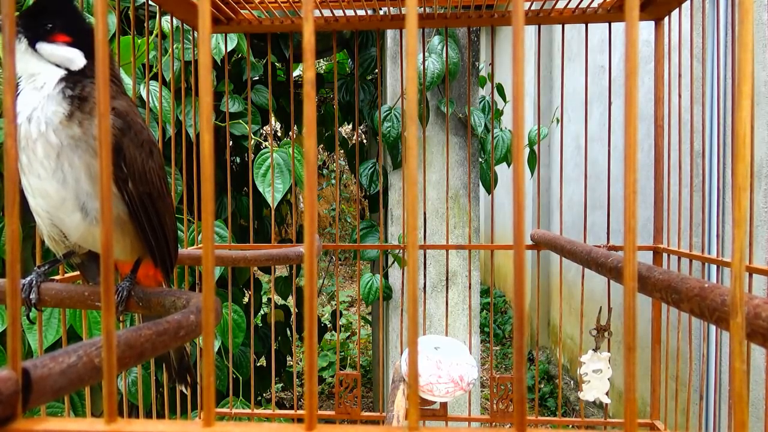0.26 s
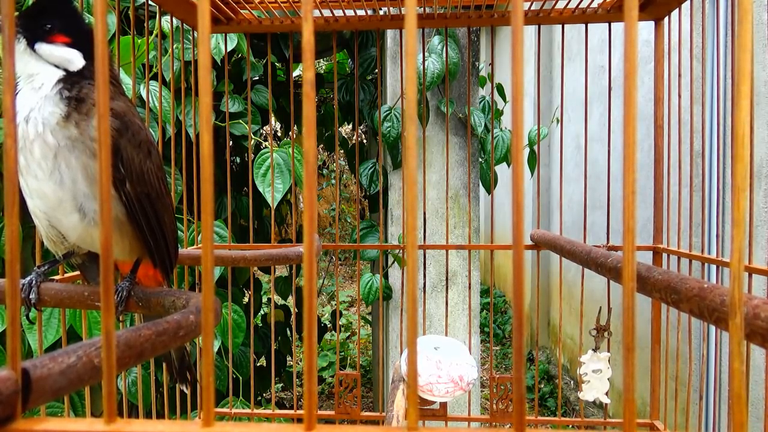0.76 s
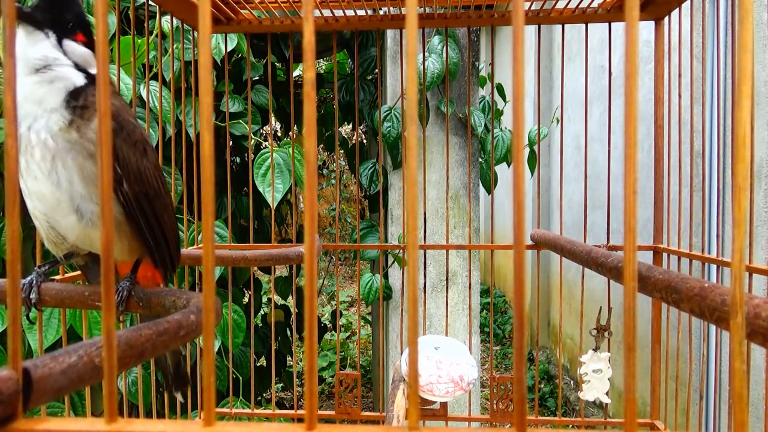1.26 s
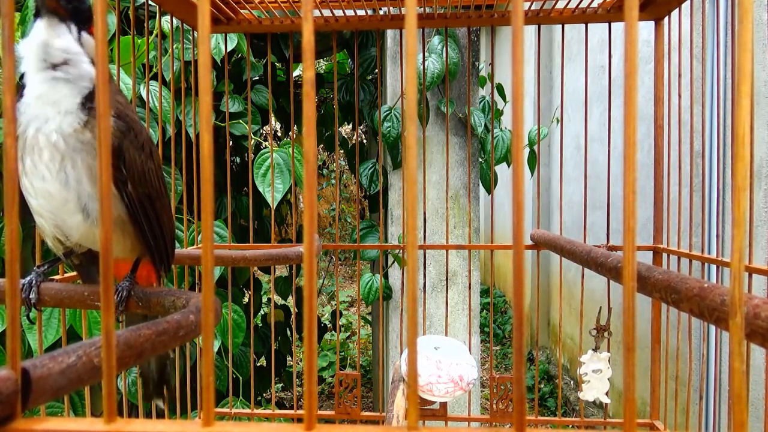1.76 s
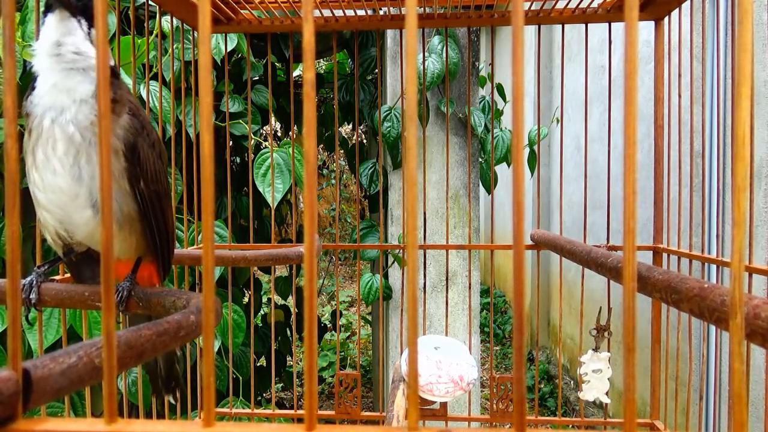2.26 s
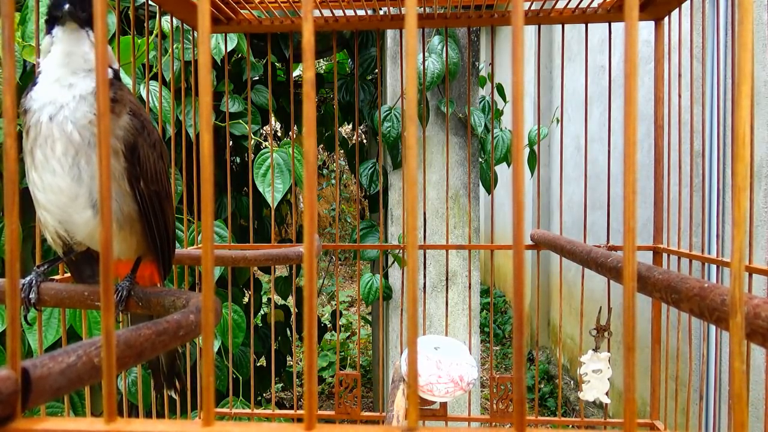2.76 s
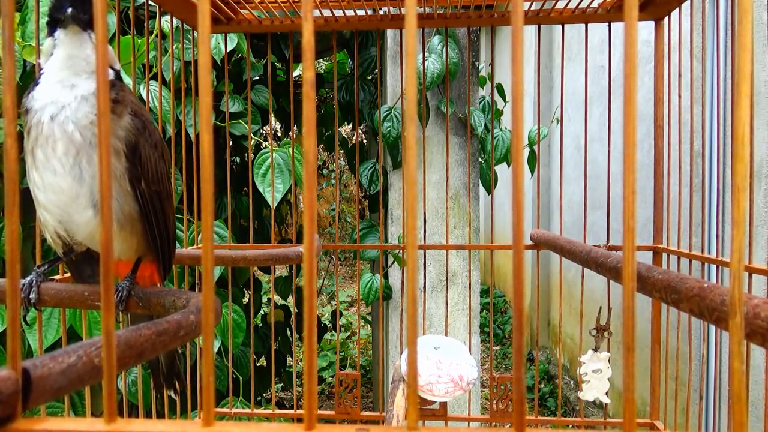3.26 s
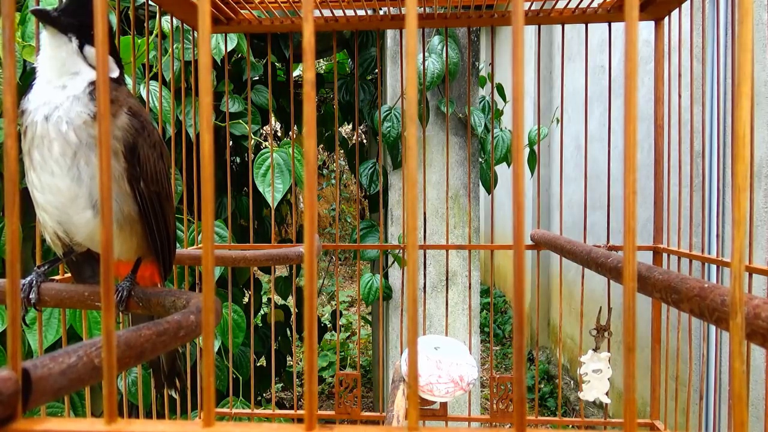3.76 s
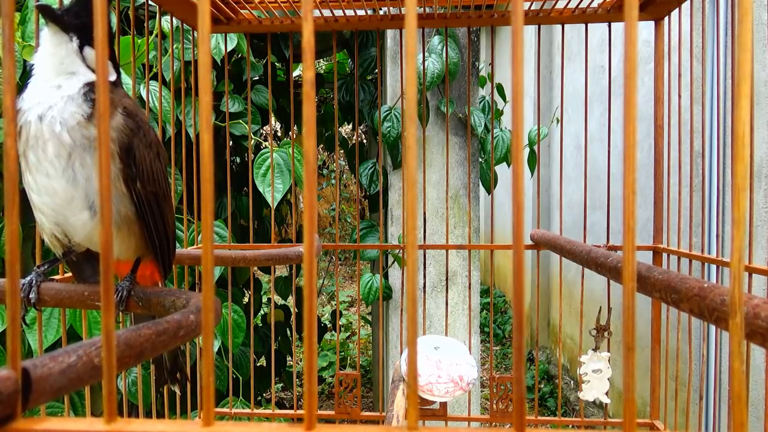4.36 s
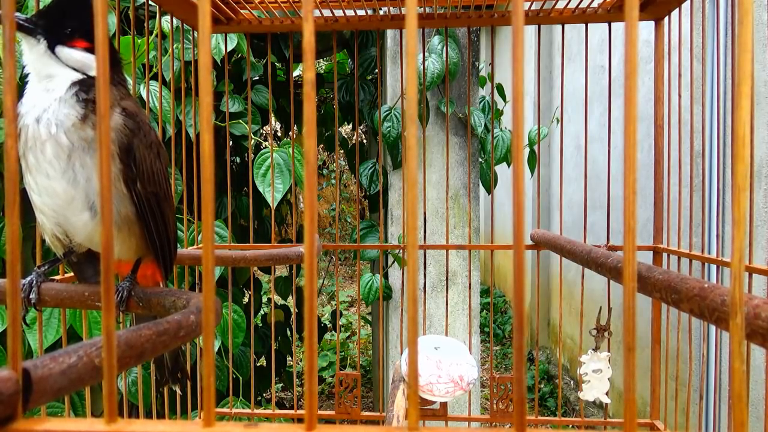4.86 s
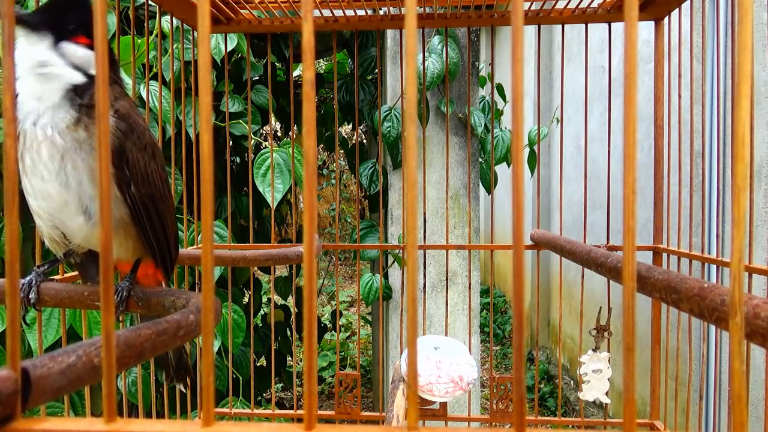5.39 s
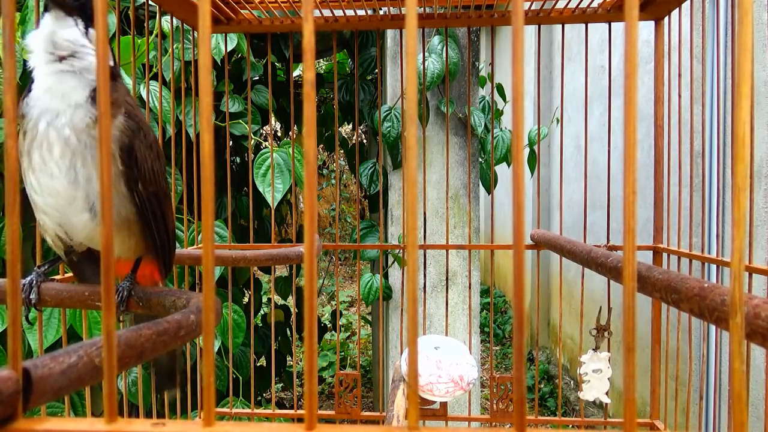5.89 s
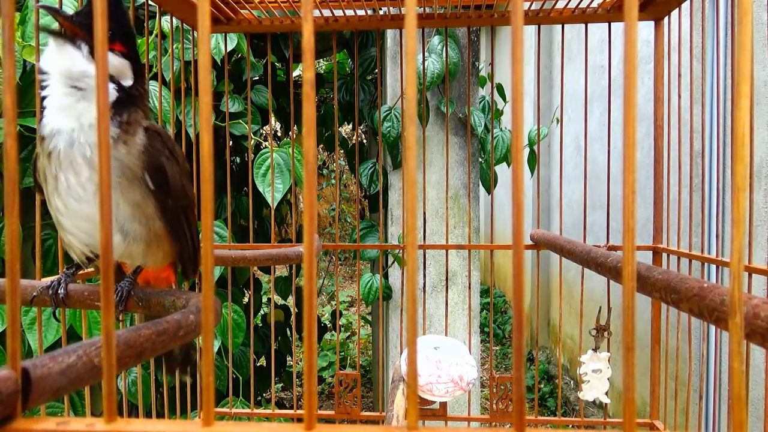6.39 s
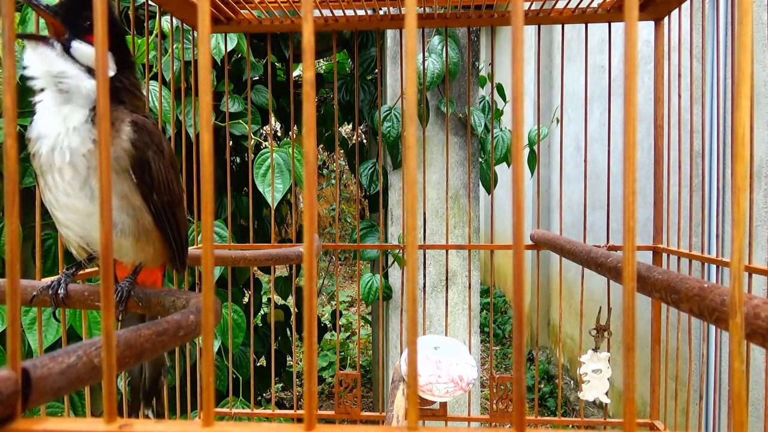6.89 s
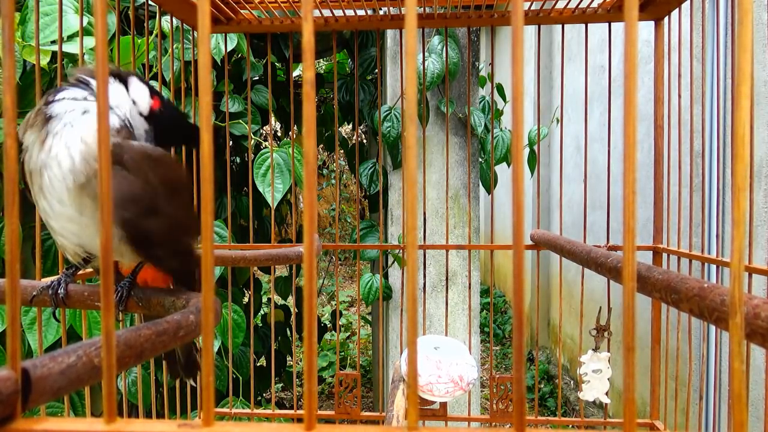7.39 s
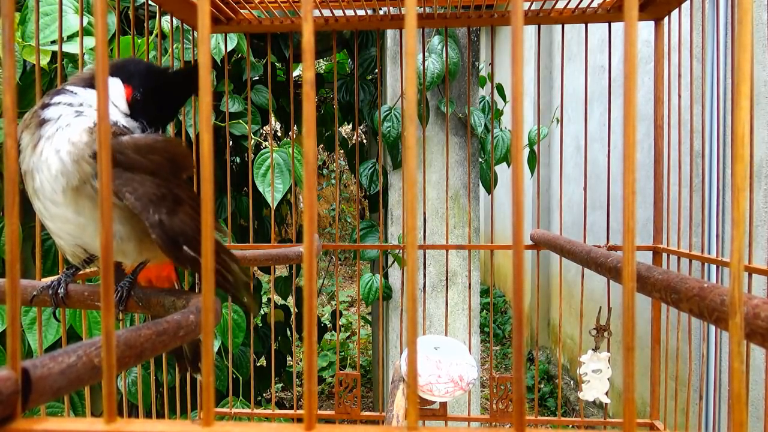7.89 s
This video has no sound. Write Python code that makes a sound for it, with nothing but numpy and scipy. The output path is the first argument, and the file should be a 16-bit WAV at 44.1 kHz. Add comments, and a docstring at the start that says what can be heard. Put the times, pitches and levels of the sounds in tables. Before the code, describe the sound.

Close, overloaded birdsong outdoors: two brief phrases of sliding, liquid whistles and rattling trills, each about a second or more, with short echoes from walls. Each loud burst makes the background duck and slowly swell back. Between and after them lie thin high insect drone, wavering distant engine hum, steady hiss, sparse remote bird calls, and slight scratches of claws and feathers.

```python
"""Loud whistles and buzzy trills: a caged bulbul sings two phrases close by in a walled garden.
Behind it insects drone, far birds call, feathers and claws scratch, distant traffic hums, and hiss lies under all.
The bird is a gliding sine with overtones, opened and shut by trill beats, roughened by overload rasp and echoed.
Insects, traffic and hiss are shaped noise; far birds and engine hums are wavering sines.
Song peaks overload a gain control, which ducks the garden and lets it swell back; one note is cut short."""
import sys
import numpy as np
from scipy import signal
from scipy.fft import rfft, irfft
from scipy.io import wavfile
from scipy.ndimage import uniform_filter1d, minimum_filter1d

SR = 44100
rng = np.random.default_rng(int(sys.argv[2]) if len(sys.argv) > 2 else 0)


def master_out(mix):
    """Clip the mix to full scale and print it as 16-bit PCM to the path in sys.argv[1]."""
    frames = np.transpose(np.atleast_2d(mix))
    ceiling = np.clip(frames, -1, 1)
    pcm = np.round(ceiling * 32767).astype(np.int16)
    wavfile.write(sys.argv[1], SR, pcm)


N = 358974
TIME_S = np.arange(N) / SR

# Rattles, fast trills on one shared upward sweep. Each row: start in s, length in s, level in dB,
# swell over the note in dB, strain in dB, starting beats per s, trill depth at the start (0-1),
# trill depth at the end (0-1), glide in s, top pitch in Hz.
RATTLE_NOTES = [ (1.545, .1, 7.5, -7.5, 10.5, 153, 0.7, 0.12, 0.087, 3550),
                (5.5177, 0.15, 14, 11.5, 4, 117.6, 1, 0.75, 0.11, 3417),
                (6.2719, 0.16, 14, 10.5, 4.5, 126, 0.92, 0.99, 0.11, 3437), ]
# Whistles, which glide onto a main pitch and bend away. Each row: the first nine columns of a rattle,
# then first, main and last pitch in Hz, closing drop as a share of the pitch.
WHISTLE_NOTES = [ (1.228, 0.075, 1, 9, -6.5, 230, 0, 0, .031, 1408, 1544, 1311, .42),
                 (1.788, 0.025, 12, 11, 10.5, 129, .9, .3, 0.015, 2557, 2930, 2600, 0),
                 (1.812, 0.043, 9.5, -5, 9, 121, 0.36, .1, 0.034, 2528, 2210, 2280, .5),
                 (1.919, 0.026, 8.5, -2.5, 12, 156, .6, 0.93, 0.034, 1386, 2500, 2500, 0),
                 (1.942, .043, 16, 3.5, 11.5, 145, .05, .1, 0.01, 2670, 3047, 3140, 0),
                 (2.049, .037, 14, 8.5, 12, 190, .5, 0, 0.01, 2897, 2323, 2280, 0),
                 (2.141, 0.034, 10.5, -15.5, 12.5, 170, 0.5, .15, 0.0064, 1380, 1720, 1637, 0),
                 (2.173, .029, 8.5, -2.5, 7.5, 130, .3, .05, 0.0076, 1957, 2235, 2030, 0),
                 (2.2053, .038, 12, -11.5, 14, 166, 0.8, 0.3, .016, 2096, 1749, 1710, 0),
                 (5.795, .029, 8, 8, 17, 120, .1, .55, 0.032, 1267, 1843, 1860, 0),
                 (5.821, 0.059, 14.5, -5, 11.5, 140, .1, .2, .033, 2083, 2338, 2310, 0),
                 (5.951, .028, 8.5, -2, 18, 167, 0.52, 0.46, 0.027, 1636, 2090, 1900, 0),
                 (5.982, .016, 15, 3, 9.5, 320, .6, .6, 0.013, 2153, 2360, 2400, 0),
                 (6.552, .081, 12.5, 10.5, 11.5, 128, .35, .15, .061, 1328, 2312, 2300, .55),
                 (6.721, .031, 7.5, -10.5, 12, 129, 0.78, 0.3, 0.034, 1607, 2028, 2050, 0),
                 (6.751, 0.052, 17.5, 17.5, 11.5, 150, 0.41, .1, 0.029, 2213, 2783, 2680, .55),
                 (6.86, 0.071, 18, -11, 11, 107, .95, 0.23, 0.079, 2105, 2507, 2500, 0),
                 (6.933, .028, 13.5, -10, 14, 137, .7, .05, 0.02, 2420, 3020, 2450, 0),
                 (6.962, 0.05, 13.5, -1.5, 15, 73, .15, 0, 0.017, 2567, 1851, 1798, .5), ]
# Relative overtone spectrum of the voice. Each row: frequency in Hz, level in dB.
OVERTONE_SPECTRUM = [(3000, -23.5), (4600, -33.5), (5600, -35), (7000, -36.5), (8200, -45), (9300, -44),
                     (10700, -29.5), (12000, -40), (13800, -39.5), (15500, -48)]
# Relative spectrum of the overload rasp on the notes. Each row: frequency in Hz, density in dB per Hz.
RASP_SPECTRUM = [(100, -3.5), (700, -6.5), (1600, -4.5), (2900, 17.5), (4500, 1.5), (7000, -1.5),
                 (8700, -12), (10800, 1.5), (12000, -6), (13400, -1.5), (15300, -13)]
# Reflections off cage, floor and walls. Each row: delay in s, level in dB relative to the song.
NEAR_REFLECTIONS = [(.0032, -24), (.0075, -24), (0.0142, -19.5), (0.022, -25.5), (.047, -38)]
# Echo decay of the garden. Each row: frequency in Hz, time to fall 60 dB in s.
GARDEN_DECAY = [(500, 0.13), (1500, 0.29), (3000, 0.53), (7000, 0.17), (14000, 0.73)]
# Far birds. Each row: start in s, length in s, first pitch in Hz, last pitch in Hz,
# level in dB ahead of the direct and echo gains.
FAR_BIRD_CALLS = [(0.032, 0.15, 4350, 4370, -53), (0.322, 0.13, 4050, 4120, -54),
                  (2.43, 0.092, 3950, 4048, -52), (4.301, 0.1, 4140, 4100, -47),
                  (4.67, 0.0805, 3770, 3930, -48.5), (5.002, 0.1, 3350, 2640, -38),
                  (7.134, 0.6, 2430, 2426, -55.5), (7.684, 0.5, 2470, 2400, -58)]
# Feathers and claws. Each row: start in s, length in s, mean level in dB at the crest.
SCRATCHES = [(4.832, .012, -59.5), (4.962, 0.0092, -56), (6.182, 0.0067, -45.5), (7.408, 0.093, -51),
             (7.654, 0.028, -62), (7.86, .025, -53.5), (8.042, .008, -50.5)]
# Insect choruses. Each row: centre in Hz, half width in Hz, mean level before the cut in dB,
# mean level after it in dB, throb depth after it (0-1).
INSECT_CHORUSES = [(4765, 170, -51.5, -51.5, 0.19), (6745, 260, -50.5, -57, 0.4),
                   (6080, 100, -60.5, -65, .6), (7480, 250, -60, -62, .6)]
# Relative spectrum of distant traffic. Each row: frequency in Hz, density in dB per Hz.
TRAFFIC_SPECTRUM = [(15, -48.5), (25, -12.5), (195, -5.5), (350, -6), (380, -2.5), (459, -9), (616, -8.5),
                    (713, -13), (997, -15.5), (1990, -25.5), (2670, -25), (3730, -31.5), (4850, -62),
                    (8210, -120)]
# Course of the traffic. Each row: time in s, swell in dB,
# tilt in dB (added to the upper part, taken from the lower).
TRAFFIC_COURSE = [(0, -2, -1.5), (1.102, -1, 1), (2.5, 0, -1.5), (3.598, -1.5, -2), (4.5, -2, -1),
                  (5.3, -2.5, -2), (5.97, -1.5, 0), (6.021, 0, -2.3), (7.199, -1.5, -1.1),
                  (8.101, -0.5, -2)]
# Engine hums. Each row: two end times in s (in either order), mean pitch in Hz, level in dB before wavering.
ENGINE_HUMS = [(-1.5, 1.3, 383, -45), (-1.27, 3.2, 615.6, -51.5), (.3, 1.56, 250.5, -47.5),
               (4.5, 3.4, 372, -44.5), (2.3, 5.5, 612.2, -50.5), (3.901, 5.8, 60.26, -51),
               (4.3, 5.9, 210, -48.5), (5.8, 6.85, 275.2, -41), (6.8, 12, 275, -39.5), (5.8, 18, 408, -43)]
# Relative spectrum of the hiss. Each row: frequency in Hz, density in dB per Hz.
HISS_SPECTRUM = [(1000, -6.5), (3500, 0), (5500, 1), (8000, -1), (10000, -4.5), (13500, -3.5),
                 (15500, -9.5)]

CUT_S = 5.985  # song and echoes break off; insects and gain control change state
BAND_LIMIT_HZ = 15750
ATTACK_S, RELEASE_S, EDGE_DB = 0.0037, 0.0045, 18.5  # a note starts and ends EDGE_DB under its level
LEAD_S, LEAD_FADE_DB, SCOOP_SHARE = .014, 11, .08  # the syrinx stirs softly and lower before a note
TAIL_S, TAIL_FADE_DB = .01, 9.5  # and slackens after it
TRILL_SLOWING_PER_S, BEAT_UNEVENNESS = 0.99, .04  # share per s; rms in beats
TRILL_SWING_SHARE, CREST_TURN = 0.12, 0.23  # pitch flick as a share of the pitch, its place in the beat
SHUT_DB, OPEN_SHAPE = 33, .95  # dip between full-depth beats
PITCH_JITTER_SHARE = .004  # rms
RATTLE_FIRST_HZ, RATTLE_SAG_HZ, RATTLE_RELEASE_S = 1892, 60.43, 0.049
FULL_STRAIN_DB, DULLING = 9.5, 0.11  # dB an octave lost per dB of strain short of full


def amp(db):
    """Decibels to gain."""
    return 10 ** (np.asarray(db) / 20)


def unit(x):
    """Scales to rms 1."""
    return x / np.sqrt(np.mean(x ** 2) + 1e-20)


def read(points, hz):
    """Interpolates a table on a log-frequency axis."""
    point_hz, value = np.transpose(points)
    return np.interp(np.log(hz + 1), np.log(point_hz + 1), value)


def add(mix, start_s, sound):
    """Mixes a sound in place, starting at start_s."""
    part = mix[max(round(start_s * SR), 0):][:len(sound)]
    part += sound[:len(part)]


def noise(shape):
    """Noise of rms 1 whose spectrum follows the gain shape(Hz)."""
    spectrum = rfft(rng.standard_normal(N)) * shape(np.fft.rfftfreq(N, 1 / SR))
    return unit(irfft(spectrum, N))


def wide(shape, side_db):
    """Two channels of noise: a shared middle and a weaker side of opposite sign."""
    return unit(noise(shape) + amp(side_db) * noise(shape) * np.array([[1], [-1]]))


def drift(hz):
    """Random motion of rms 1, its spectrum fading around hz."""
    return noise(lambda f: np.exp(-(f / hz) ** 2))


def syllable(waver, start_s, length_s, level_db, swell_db, strain_db, beats_per_s, depth_first, depth_last,
             glide_s, first_hz, main_hz, last_hz, drop_share, release_s,
             open_lag_rad=.45, overtone_db=5.0, even_db=-6, rasp_shut=0.12):
    """One note and its rasp strength; each beat opens the syrinx, flicks the pitch up and shuts it."""
    t = np.arange(-LEAD_S, length_s + TAIL_S, 1 / SR)
    held = np.clip(t, 0, length_s)
    wobble = np.interp(start_s + t, TIME_S, waver)
    lead = np.maximum(-t / LEAD_S, 0)
    tail = np.maximum((t - length_s) / TAIL_S, 0)

    # Pitch: glide on, bend away, trill on top
    approach = np.maximum(1 - held / glide_s, 0) ** 2
    bend = (np.maximum(held - glide_s, 0) / max(length_s - glide_s, 1e-3)) ** 2
    hz = main_hz + (first_hz - main_hz) * approach + (last_hz - main_hz) * bend
    hz = hz * (1 - SCOOP_SHARE * lead - drop_share * tail)
    depth = np.clip(depth_first + (depth_last - depth_first) * held / length_s, 0, 1)
    beats = beats_per_s * t * (1 - TRILL_SLOWING_PER_S * t / 2) + BEAT_UNEVENNESS * wobble
    beat_rad = 2 * np.pi * beats
    # narrow crest, flat trough
    flick = 2 * ((1 + np.cos(beat_rad - 2 * np.pi * CREST_TURN)) / 2) ** 2 - .5
    hz = abs(hz * (1 + PITCH_JITTER_SHARE * wobble) + TRILL_SWING_SHARE * main_hz * depth * flick)

    phase = 2 * np.pi * np.cumsum(hz) / SR
    tone = np.sin(phase)
    for k in range(2, 12):
        strain_tilt_db = DULLING * (strain_db - FULL_STRAIN_DB) * np.log2(k)
        bright_db = overtone_db + strain_tilt_db + even_db * (k % 2 == 0)
        gain = amp(bright_db + read(OVERTONE_SPECTRUM, k * hz)) * (k * hz < BAND_LIMIT_HZ)
        tone = tone + gain * np.sin(k * phase)

    # Loudness: attack, swelling or sagging hold, release, dip at every beat
    attack = np.maximum(1 - held / ATTACK_S, 0) ** 2
    release = np.maximum(1 - (length_s - held) / release_s, 0) ** 2
    envelope_db = level_db + swell_db * (held / length_s - .5) - EDGE_DB * (attack + release)
    envelope_db = envelope_db - LEAD_FADE_DB * lead - TAIL_FADE_DB * tail
    envelope = amp(envelope_db) * (1 - (lead + tail) ** 2)
    shut_db = SHUT_DB * depth ** 2 * ((1 + np.cos(beat_rad - open_lag_rad)) / 2) ** OPEN_SHAPE
    return envelope * amp(-shut_db) * tone, envelope * amp(strain_db - rasp_shut * shut_db)


def garden(x, build_s=0.029):
    """Diffuse echoes from walls and leaves, each band dying at its own speed."""
    taps = rng.standard_normal(SR) + 0.19 * rng.standard_normal((2, SR))
    hz, t, bands = signal.stft(taps, SR, nperseg=256)
    decay = amp(-60 * t / read(GARDEN_DECAY, hz)[:, None])
    bands = bands * decay * (1 - np.exp(-t / build_s))
    tail = signal.istft(bands, SR, nperseg=256)[1]
    tail = tail / np.linalg.norm(tail[0])
    return signal.fftconvolve(x[None], tail, axes=1)[:, :N]


def bulbul(notes, rasp_db=-42, wet_db=-26.0, treble_db=-7):
    """Notes with reflections, diffuse tail and overload rasp: distortion-like noise following their loudness."""
    song, rasp_strength, waver = np.zeros(N), np.zeros(N), drift(250)
    for note in notes:
        tone, strength = syllable(waver, *note)
        add(song, note[0] - LEAD_S, tone)
        add(rasp_strength, note[0] - LEAD_S, strength)
    near = song.copy()
    for delay_s, db in NEAR_REFLECTIONS:
        add(near, delay_s, amp(db) * song)
    # the song's treble is added to one channel and subtracted from the other
    highpass = signal.butter(8, 5000, "high", fs=SR, output="sos")
    side_treble = amp(treble_db) * signal.sosfilt(highpass, song) * np.array([[1], [-1]])
    rasp = amp(rasp_db) * rasp_strength * wide(lambda f: amp(read(RASP_SPECTRUM, f)), side_db=-13)
    return near + side_treble + rasp + amp(wet_db) * garden(song)


def cut_song():
    """The bird's two phrases; all song begun before CUT_S, echoes included, breaks off there."""
    notes = [(*row, RATTLE_FIRST_HZ, top_hz, top_hz - RATTLE_SAG_HZ, 0, RATTLE_RELEASE_S)
             for *row, top_hz in RATTLE_NOTES]
    notes += [(*row, RELEASE_S) for row in WHISTLE_NOTES]
    early = bulbul([note for note in notes if note[0] < CUT_S])
    late = bulbul([note for note in notes if note[0] >= CUT_S])
    return early * np.clip((CUT_S - TIME_S) / 0.00019, 0, 1) + late


def far_birds(settle_s=.016, direct_db=-5, wet_db=-3, waver_share=0.011):
    """Thin distant whistles that slide onto their pitch, blurred by echoes."""
    calls = np.zeros(N)
    for start_s, length_s, first_hz, last_hz, db in FAR_BIRD_CALLS:
        t = np.arange(0, length_s, 1 / SR)
        hz = last_hz + (first_hz - last_hz) * np.exp(-t / settle_s)
        hz = hz * (1 + waver_share * drift(40)[:len(t)])
        tone = np.sin(2 * np.pi * np.cumsum(hz) / SR)
        add(calls, start_s, amp(db) * signal.windows.tukey(len(t), .5) * tone)
    return amp(direct_db) * calls + amp(wet_db) * garden(calls)


def preening():
    """Brief soft scratches of feathers and claws: noise bursts of uneven level."""
    level = np.zeros(N)
    for start_s, length_s, db in SCRATCHES:
        add(level, start_s, amp(db) * np.hanning(int(length_s * SR)))
    scratch = wide(lambda f: f / (f + 2000) / (1 + (f / 13000) ** 4), side_db=-15)
    return level * amp(3.34 * drift(200)) * scratch


def insects(flutter_db=-1.5, throbs_per_s=6.5):
    """Stridulation as narrow fluttering noise bands, which throb after the cut."""
    late, out = TIME_S > CUT_S, np.zeros((2, N))
    throb = np.sin(2 * np.pi * (throbs_per_s * TIME_S + 0.3 * drift(1.1)))
    for centre_hz, width_hz, early_db, late_db, depth in INSECT_CHORUSES:
        band = wide(lambda f: np.exp(-abs((f - centre_hz) / width_hz) ** 2.4 / 2), side_db=-20.0)
        level_db = np.where(late, late_db, early_db) + flutter_db * drift(25)
        out += band * amp(level_db) * (1 + depth * late * throb)
    return out


def traffic(level_db=-40.5, split_hz=300, lumpy_db=1.5, hum_waver_db=3.5, hum_waver_hz=4.5):
    """A far noise rumble that swells and changes tilt, with wavering sine engine hums."""
    time_s, *columns = np.transpose(TRAFFIC_COURSE)
    swell_db, tilt_db = (np.interp(TIME_S, time_s, column) for column in columns)
    rumble = wide(lambda f: amp(read(TRAFFIC_SPECTRUM, f)) / (1 + (f / 4200) ** 8), side_db=-15.0)
    low = signal.sosfiltfilt(signal.butter(2, split_hz, fs=SR, output="sos"), rumble)
    tilted = low * amp(-tilt_db) + (rumble - low) * amp(tilt_db)
    out = amp(level_db + swell_db + lumpy_db * drift(30)) * tilted
    for start_s, end_s, hz, db in ENGINE_HUMS:
        progress = np.clip((TIME_S - start_s) / (end_s - start_s), 0, 1)
        passing = np.sqrt(np.sin(np.pi * progress) + 1e-12)
        tone = np.sin(2 * np.pi * np.cumsum(hz + hum_waver_hz * drift(12)) / SR)
        out += amp(db + hum_waver_db * drift(15)) * passing * tone
    return out


def hiss():
    """Steady shaped noise."""
    return amp(-55.0) * wide(lambda f: amp(read(HISS_SPECTRUM, f)), side_db=-16.5)


def scene():
    """The bird a little to the right, over the garden's background."""
    song = cut_song() * amp([[-1.9], [0]])
    return song + far_birds() + preening() + insects() + traffic() + hiss()


def gain_control(x, threshold_db=3.5, share=0.68, excess_decay_db_per_s=5.5):
    """Drops the gain quickly by a share of the peak excess, which then decays linearly in dB."""
    peak_db = 20 * np.log10(abs(x).max(0) + 1e-9)
    decay_db = np.arange(x.shape[1]) / SR * excess_decay_db_per_s
    held_peak_db = np.maximum.accumulate(peak_db + decay_db) - decay_db
    over_db = np.maximum(held_peak_db - threshold_db, 0)
    return x * amp(-share * uniform_filter1d(over_db, size=60))


def record(dry, ceiling_db=0.96):
    """Gain control (afresh after the cut), a fast limiter, clipping and the band limit."""
    parts = np.split(dry, [round(CUT_S * SR)], axis=1)
    x = np.hstack([gain_control(part) for part in parts])
    peak = -minimum_filter1d(-abs(x).max(0), size=40)
    peak = uniform_filter1d(peak, size=30)
    x = np.clip(x / (1 + (peak / amp(ceiling_db)) ** 8) ** (1 / 8), -1, 1)
    lowpass = signal.firwin(511, BAND_LIMIT_HZ, window=("kaiser", 9), fs=SR)
    return signal.oaconvolve(x, lowpass[None], "same", axes=1)


dry = scene()
out = record(dry)
master_out(out)
```